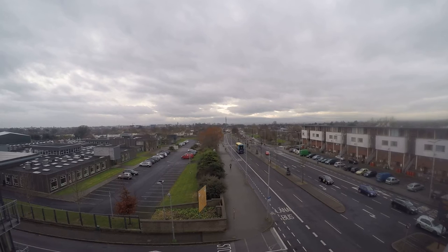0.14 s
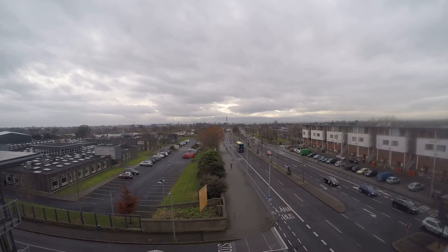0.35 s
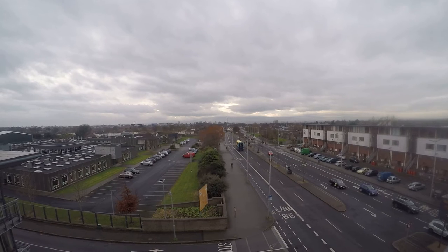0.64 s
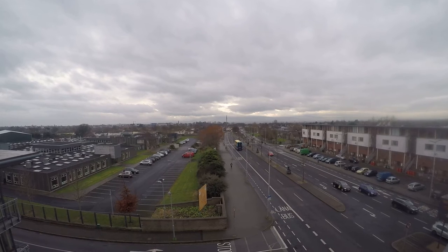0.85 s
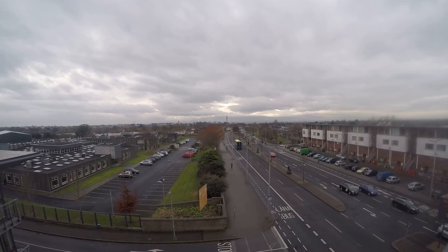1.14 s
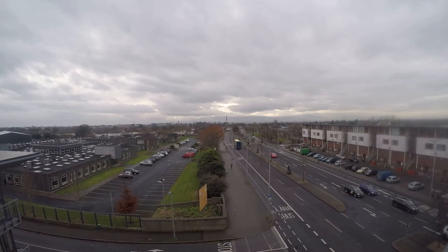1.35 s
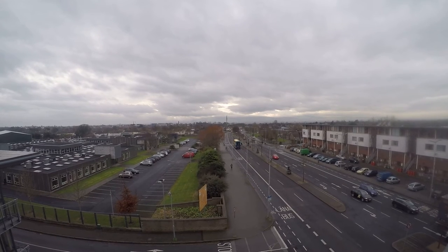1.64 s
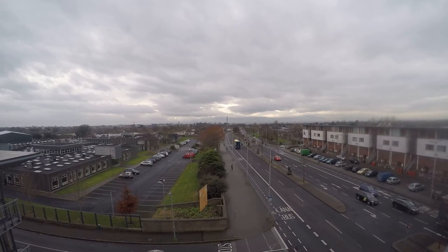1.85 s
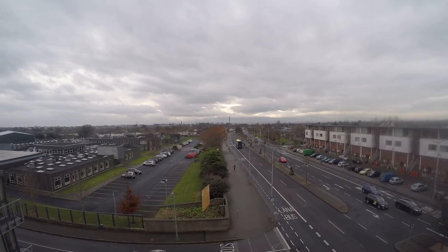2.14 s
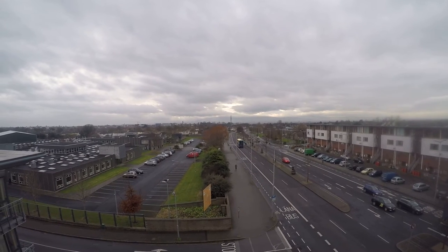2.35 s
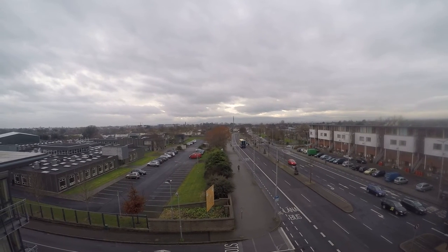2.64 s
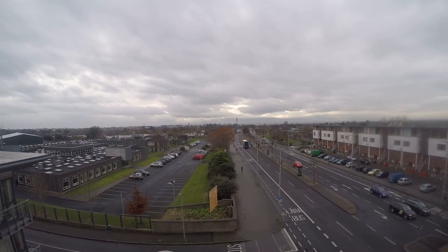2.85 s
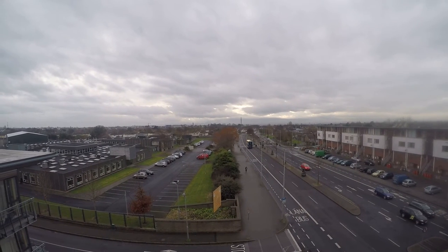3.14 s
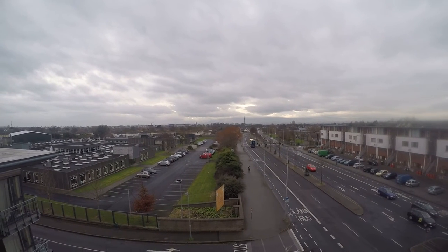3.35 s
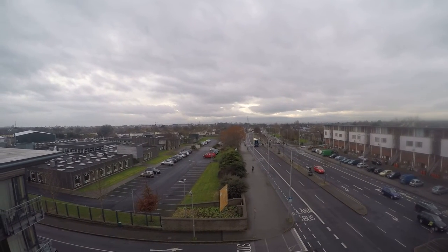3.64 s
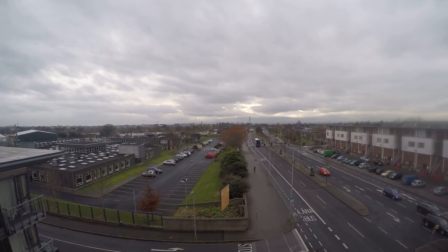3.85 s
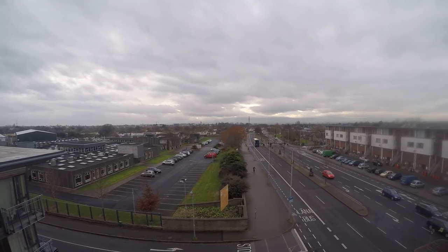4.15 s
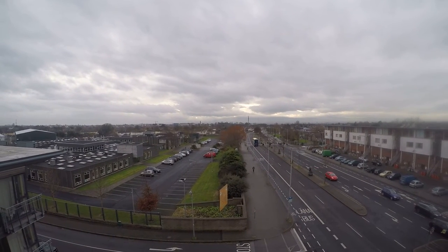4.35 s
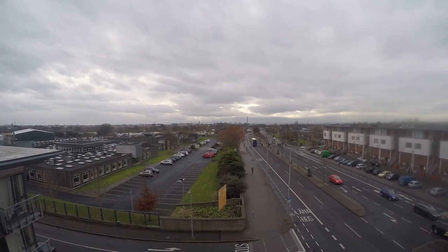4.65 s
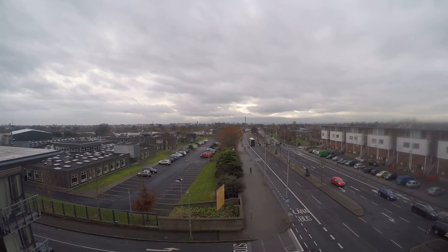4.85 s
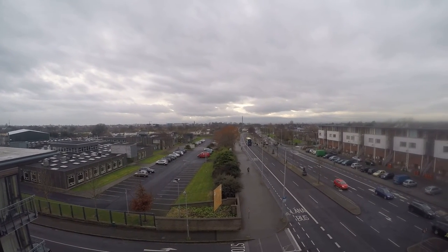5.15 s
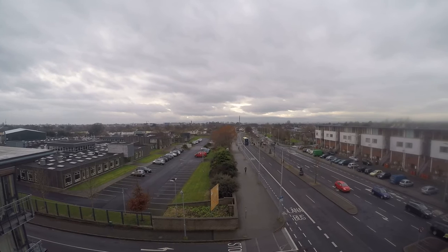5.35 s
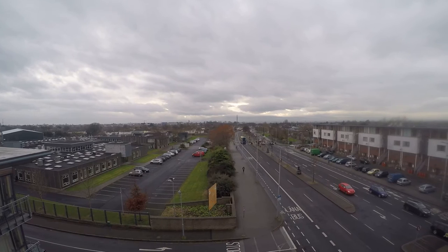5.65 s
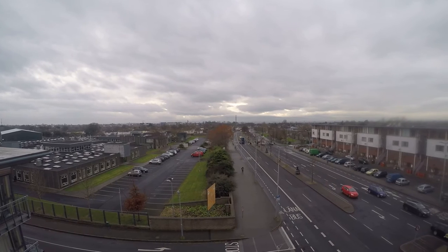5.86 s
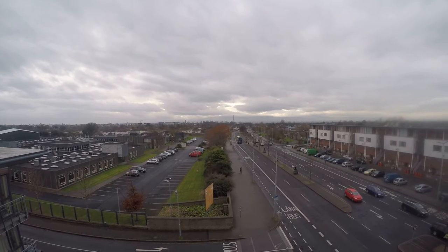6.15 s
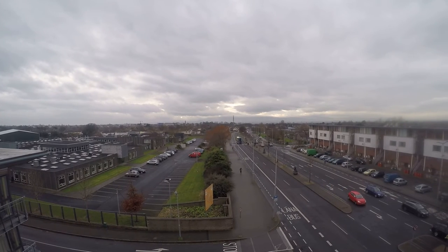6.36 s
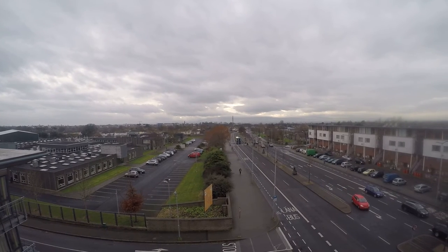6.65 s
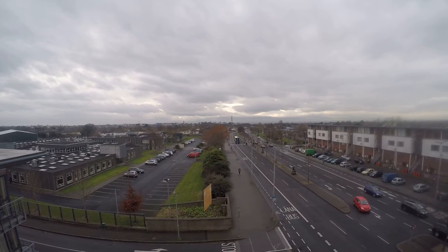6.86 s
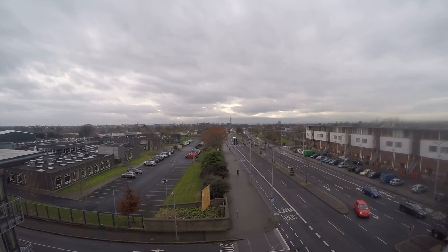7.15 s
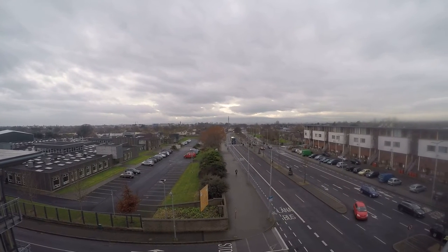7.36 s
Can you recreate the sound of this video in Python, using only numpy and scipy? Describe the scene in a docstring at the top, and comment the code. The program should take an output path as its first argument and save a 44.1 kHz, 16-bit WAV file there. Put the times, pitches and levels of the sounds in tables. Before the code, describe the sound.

Distant traffic rolls along a wide road as gusts thump the microphone; air brakes hiss twice and a short scrape follows.

```python
"""Tyres roar on a busy multi-lane road, heard from a high perch through a small camera in a plastic housing.
Engines rumble far below as their firings ring the exhausts, and a few nearer cars roll by.
Gusts buffet the microphone, the electronics whine thinly, and something ticks faintly and high.
Air brakes let out two hissing jets, and a short dry scrape judders at the end."""
import sys
import numpy as np
from scipy import signal
from scipy.fft import rfft, irfft, next_fast_len
from scipy.io import wavfile
from scipy.ndimage import uniform_filter1d, map_coordinates

SR = 44100
rng = np.random.default_rng(int(sys.argv[2]) if len(sys.argv) > 2 else 0)


def store_wav(level_fs):
    """Save 16-bit WAV to argv[1]."""
    pcm = np.round(np.clip(np.atleast_2d(level_fs), -1, 1) * 32767)
    wavfile.write(sys.argv[1], SR, pcm.T.astype(np.int16))


N = 331191
T = np.arange(N) / SR


def undb(db):
    """Decibels to gain."""
    return np.exp(np.maximum(db, -300) * (np.log(10) / 20))


def unit(x):
    """Scale to rms 1."""
    return x / np.sqrt(np.mean(x ** 2))


def curve(rows, column=1):
    """Automation lane: one column of a table, joined by straight lines in time."""
    rows = np.array(rows)
    return np.interp(T, rows[:, 0], rows[:, column])


def equalise(x, response):
    """Filter by a function that gives dB for each frequency."""
    size = next_fast_len(N + 4096)
    hz = np.maximum(np.fft.rfftfreq(size, 1 / SR), 1)
    return irfft(rfft(x, size) * undb(response(hz)), size)[:N]


def colour(x, points):
    """Shape x with an EQ curve of (frequency [Hz], gain [dB]) points, at rms 1."""
    hz, db = np.transpose(points)
    return unit(equalise(x, lambda f: np.interp(np.log(f), np.log(hz), db)))


def resonance(x, hz, width_hz):
    """Two-pole band-pass, at rms 1."""
    return unit(signal.lfilter(*signal.iirpeak(hz, hz / width_hz, fs=SR), x))


def noise():
    """White noise."""
    return rng.standard_normal(N)


def narrow(hz, width_hz):
    """Noise through the same resonance twice: steep skirts."""
    return resonance(resonance(noise(), hz, width_hz), hz, width_hz)


def walk(rate):
    """Random modulator that glides to about rate new values a second, at rms 1."""
    size = int(SR / rate)
    steps = rng.standard_normal(2048)[np.arange(N) // size]
    return unit(uniform_filter1d(steps, size))


def swell(s, half_width):
    """A bell-shaped envelope around time s."""
    return np.exp(-np.minimum(((T - s) / half_width) ** 2, 80) / 2)


def burst(s, attack, hold, release_db_per_s):
    """Envelope that rises from time s, holds and dies away."""
    age = T - s
    return np.clip(age / attack, 0, 1) * undb(-release_db_per_s * np.maximum(age - attack - hold, 0))


def even(x, seconds):
    """Leveller: divide out the signal's own slow swells."""
    return x / np.sqrt(uniform_filter1d(x ** 2, int(seconds * SR)) + 1e-9)


def tyres(db=-38.0, flicker_db=0.61):
    """Many tyres merge into one roar; each register flickers and the hiss drifts slowly."""
    # tyre roar of the whole road (frequency [Hz], gain [dB])
    roar_spectrum = [(60, 0.5), (140, 0), (250, 1), (400, -5.7), (560, -6.5), (1000, -10.5), (1500, -14.5),
                     (2200, -18.5), (2900, -22), (3300, -26), (4500, -29), (6500, -38), (9000, -45),
                     (15000, -51.5)]
    # drift of the hiss above 3.2 kHz (time [s], gain [dB])
    hiss_drift = [(0, 1.3), (1.1, 0.4), (2.5, .1), (3.6, 0), (4.2, -1), (4.85, 0.8), (5.45, -1.2),
                  (6.1, -0.5), (7.5, .3)]
    roar = colour(noise(), roar_spectrum)
    bands, below = 0, 0
    for edge_hz in (300, 700, 1500, 3200):
        upto = equalise(roar, lambda f: -10 * np.log10(1 + (f / edge_hz) ** 8))
        bands += (upto - below) * undb(flicker_db * walk(14))
        below = upto
    hiss = (roar - below) * undb(curve(hiss_drift) + flicker_db * walk(14) / 2)
    return (bands + hiss) * undb(db)


def engine(hz, uneven=0.0254, rough_db=1.0, pipe_hz=65, pipe_width_hz=50):
    """Uneven firings ring an exhaust; only the boom carries this far."""
    cycles = np.cumsum(hz * (1 + uneven * walk(9))) / SR
    firings = np.diff(np.floor(cycles), prepend=0) * undb(rough_db * walk(30))
    return unit(resonance(resonance(firings, pipe_hz, pipe_width_hz), pipe_hz, pipe_width_hz))


def engines(octave_db=-20, pitch_waver=0.0085, waver_db=2):
    """Cruising engines swell and fade; one clean hum sinks as its driver lifts off."""
    # engines in the stream (firing rate [Hz], level [dB])
    stream = [(46, -43.5), (59, -45), (71, -48)]
    # the engine that eases off (time [s], firing rate [Hz], level [dB])
    easing = [(4.6, 88, -51), (4.83, 86, -35), (4.98, 82, -33.5), (5.2, 73, -36), (5.32, 60.4, -38),
              (5.42, 53.3, -37), (5.7, 50.5, -45)]
    cruising = sum(engine(hz * (1 + .03 * walk(0.99))) * undb(db + 1.2 * walk(1.92))
                   for hz, db in stream)
    phase = 2 * np.pi * np.cumsum(curve(easing) * (1 + pitch_waver * walk(9.8))) / SR
    hum = unit(np.sin(phase) + undb(octave_db) * np.sin(2 * phase))
    return cruising + hum * undb(curve(easing, column=2) + waver_db * walk(23))


def wind_strength(breeze_db=-30, flutter_db=1.27, flutters_per_s=14):
    """Gusts build and die over the breeze, adding in power; the whole flow flutters."""
    # brief lulls in the breeze (time [s], half-width [s], depth [dB])
    lulls = [(.28, 0.025, -8), (.85, 0.09, -3), (2.862, 0.042, -11), (3.313, 0.11, -5.5), (5.1, 0.22, -3.5),
             (5.49, 0.086, -7.5), (5.78, 0.022, -6), (6.58, .03, -7)]
    # gusts on top of it (peak time [s], build-up [s], dying away [s], level [dB])
    gusts = [(.42, 0.06, 0.1, -23), (.64, 0.068, 0.045, -20.5), (1.65, 0.17, 0.17, -31),
             (2.32, 0.3, 0.087, -27.5), (4.3, 0.16, .12, -23.5), (4.57, 0.085, 0.07, -17),
             (4.71, .03, 0.04, -22.5), (5.677, 0.02, 0.022, -22), (5.94, .015, .03, -24.5),
             (6.165, 0.031, 0.043, -15.5), (6.35, .1, 0.05, -26), (6.67, .02, .025, -23.5),
             (6.8, 0.03, 0.06, -23.5), (7.03, 0.03, 0.052, -23), (7.3, 0.07, 0.21, -25)]
    breeze = undb(breeze_db + sum(depth_db * swell(s, span) for s, span, depth_db in lulls))
    gust_power = sum((undb(db) * swell(s, np.where(T < s, build, fall))) ** 2
                     for s, build, fall, db in gusts)
    return np.sqrt(breeze ** 2 + gust_power) * undb(flutter_db * walk(flutters_per_s))


def wind():
    """Slow eddies follow the gusts; the hardest ones slap the housing and reach higher."""
    # rumble of the eddies (frequency [Hz], gain [dB])
    eddies = [(8, -10.5), (20, 1), (30, 3.5), (50, 1), (68, -5), (90, -10.5), (140, -24.5), (300, -37),
              (1000, -93)]
    # slaps on the housing (time [s], half-width [s], level [dB], centre [Hz], bandwidth [Hz])
    buffets = [(0.526, 0.07, -29, 90, 70), (0.639, 0.019, -25.5, 75.6, 100), (2.14, 0.022, -39, 191, 35),
               (2.296, 0.08, -31, 48, 18), (4.46, 0.022, -31.5, 135, 80), (4.555, 0.034, -24, 80, 110),
               (4.55, .03, -39, 320, 220), (4.692, 0.035, -28, 100, 70), (5.683, 0.015, -25, 122, 35),
               (5.845, 0.017, -27, 112, 60), (5.91, .025, -31, 100, 40), (6.163, 0.017, -19.5, 70, 65),
               (6.167, 0.017, -36, 250, 150), (7.377, 0.11, -26, 47.7, 28)]
    out = even(colour(noise(), eddies), 0.0995) * wind_strength()
    for s, span, db, hz, width_hz in buffets:
        out += even(narrow(hz, width_hz), 0.0348) * swell(s, span) * undb(db)
    return out


def whine(hz=10275, width_hz=30, db=-86):
    """The thin whine of the camera's electronics."""
    return resonance(noise(), hz, width_hz) * undb(db)


def ticks(rise_s=0.012, fall_s=0.013, gap_s=.135, jitter_s=0.019, faint_db=-70.5, sizzle_db=-71.5):
    """High ticks smeared by distance: clear ones over a faint, loose pulse and a soft early sizzle."""
    # what the ticks ring with, lowest first (centre [Hz], bandwidth [Hz], relative level [dB])
    modes = [(5760, 520, 0), (6800, 750, -4), (7400, 2400, -2.5), (7850, 1000, -4.5)]
    # the clearer ticks (time [s], level [dB], stress on the lowest ring [dB])
    clear = [(.08, -60, 0), (.19, -62, 1), (.34, -65, -3), (.453, -61, -2), (.595, -59.5, -1),
             (.71, -63, 2), (.86, -66.5, 0), (.965, -63, 0), (.995, -62, 6), (1.05, -60, 9),
             (1.102, -55.3, 2), (1.208, -56.5, -1), (1.34, -60.5, -3), (1.587, -60, 3), (1.69, -61, 0),
             (1.825, -64, 1), (2.075, -64.5, -2), (2.19, -65, -2), (2.575, -61, -1), (2.68, -65, 0),
             (4.46, -66, 0), (4.75, -68, -2), (4.885, -67, -4), (5.04, -67.5, -3), (5.188, -68, -3),
             (5.36, -72, -2), (5.805, -67, 1)]
    faint = [(k * gap_s + jitter_s * late, faint_db + 1.5 * loud, 0)
             for k, (late, loud) in enumerate(rng.standard_normal((60, 2)))]
    low, *upper = (narrow(hz, width_hz) * undb(db + 1.3 * walk(9.8)) for hz, width_hz, db in modes)
    rings = np.array([low, sum(upper)])
    # one envelope for the lowest ring, one for the rest; the sizzle is their floor
    envelopes = np.tile(undb(sizzle_db) * swell(0.94, half_width=1), (2, 1))
    for s, db, stress_db in faint + clear:
        near = slice(*np.searchsorted(T, [s - .1, s + .1]))
        age = T[near] - s
        shape = undb(db) * np.exp(-(age / np.where(age < 0, rise_s, fall_s)) ** 2 / 2)
        balance = unit(undb(np.array([stress_db, 0])))
        envelopes[:, near] = np.maximum(envelopes[:, near], np.outer(balance, shape))
    return np.sum(rings * envelopes, axis=0) / np.std(rings.sum(axis=0))


def cars(drift=.03, drifts_per_s=2.5):
    """A few cars stand a little out of the stream; their resonances slide with speed and bearing."""
    # ring of body, tyre note and tread (centre [Hz], bandwidth [Hz], base level [dB])
    modes = [(441, 107, -48.5), (990, 240, -57), (2550, 360, -60)]
    # pass-bys (time [s], half-width [s], body and tread gain [dB], tyre note gain [dB])
    passes = [(.15, .22, -3, -5), (1.55, 0.27, -4, -2), (2.25, 0.42, 0, 0.5), (3.65, 0.35, -6.5, -3),
              (4.85, 0.23, -4, -4), (6, .4, -20, -3), (6.899, 0.23, -15, 2)]
    playhead = np.cumsum(1 + drift * walk(drifts_per_s))  # varispeed bends all three together
    rings = (even(narrow(hz, width_hz), .15) * undb(db) for hz, width_hz, db in modes)
    body, note, tread = (map_coordinates(ring, [playhead], mode="mirror") for ring in rings)
    return sum(((body + tread) * undb(body_db) + note * undb(note_db)) * swell(s, span)
               for s, span, body_db, note_db in passes)


def jet(envelope, spectrum, edge_hz, dulling=0.77):
    """Escaping air; as the pressure drops, the top of its hiss dies first."""
    air = colour(noise(), spectrum)
    body = equalise(air, lambda f: -10 * np.log10(1 + (f / edge_hz) ** 16))
    return (body + (air - body) * envelope ** dulling) * envelope


def air_brakes(waver_hz=95):
    """Two jets of air open fast and die away; the second whistles, sagging as the pressure drops."""
    # whistles of the opening valve (time [s], half-width [s], level [dB], pitch [Hz], sag [Hz/s])
    whistles = [(6.266, 0.012, -48, 2400, 3000), (6.25, .014, -53, 2870, 1),
                (6.315, 0.037, -57.5, 4130, 499), (6.28, 0.022, -61, 6100, 0)]
    # the two jets (start [s], attack [s], hold [s], release [dB/s], level [dB], dulls above [Hz])
    blasts = [(2.226, .007, .075, 40, -57.5, 12500), (6.222, 0.037, .008, 100, -47.5, 6400)]
    # the first, thin hiss (frequency [Hz], gain [dB])
    thin_jet = [(2500, -31), (5000, 0.5), (7500, -1.5), (11000, -2.5), (13500, -9), (15500, -9)]
    # the second, full hiss (frequency [Hz], gain [dB])
    full_jet = [(1500, -30), (2400, -4), (3400, -2.5), (4200, 1), (5000, -0.5), (6500, -11), (7700, -7.5),
                (8800, -20), (11000, -22), (14000, -35)]
    out = 0
    for s, span, db, hz, sag_hz_per_s in whistles:
        pitch = hz - sag_hz_per_s * np.clip(T - s, -.1, .1) + waver_hz * walk(200)
        out += unit(np.sin(2 * np.pi * np.cumsum(pitch) / SR)) * swell(s, span) * undb(db)
    for (s, attack, hold, release, db, edge_hz), spectrum in zip(blasts, (thin_jet, full_jet)):
        out += jet(burst(s, attack, hold, release), spectrum, edge_hz) * undb(db)
    return out


def scrape(slips_per_s=900, spread_db=1.0, judder_db=0.8, judders_per_s=130):
    """Three dry, juddering strokes: dense little slips and friction noise rattle several resonances."""
    # what the scrape keeps ringing (centre [Hz], bandwidth [Hz], relative level [dB])
    modes = [(1170, 260, -22), (1420, 200, -15), (1850, 400, -20), (2200, 250, -13.5), (2600, 380, -11.5),
             (3030, 250, -19), (3900, 200, -24.5), (4300, 250, -26)]
    # broad tone of the rubbing (frequency [Hz], gain [dB])
    rub_spectrum = [(200, 4), (500, 6.5), (1200, 0), (2200, 1.5), (2900, -2.5), (3400, -3), (4300, -11),
                    (5200, -11.5), (6500, -29), (10000, -50)]
    # the strokes (start [s], hold [s], level [dB])
    strokes = [(7.176, 0.08, -40), (7.294, 0.095, -38.5), (7.42, .08, -44)]
    slips = noise() * undb(spread_db * noise()) * (rng.random(N) < slips_per_s / SR)
    friction = unit(slips) + 1.5 * noise()
    rings = sum(undb(db) * resonance(resonance(friction, hz, width_hz), hz, 600)
                for hz, width_hz, db in modes)
    rub = even(colour(friction, rub_spectrum) + rings, 0.022)
    pressure = np.max([burst(s, attack=0.013, hold=hold, release_db_per_s=400) * undb(db)
                       for s, hold, db in strokes], axis=0)
    return rub * pressure * undb(judder_db * walk(judders_per_s))


def knock(start_s=7.19, attack_s=0.0066):
    """A soft knock starts the scrape: four modes ring briefly."""
    # the struck modes (frequency [Hz], level [dB], time to fall 60 dB [s])
    modes = [(300, -30, 0.11), (445, -27.5, 0.069), (613, -24, 0.07), (1130, -32.5, 0.14)]
    age = np.maximum(T - start_s, 0)
    ring = sum(undb(db - 60 * age / t60) * np.sin(2 * np.pi * hz * age) for hz, db, t60 in modes)
    return ring * (1 - np.exp(-age / attack_s))


def scene():
    """Road, wind and small events at one microphone."""
    bed = tyres() + engines() + wind() + whine()
    return (bed + ticks() + cars() + air_brakes() + scrape() + knock())[None]


def record(dry):
    """The plastic housing colours everything; the camera cuts the top above 15.2 kHz."""
    # resonances and notches of the housing (centre [Hz], half-width [Hz], gain [dB])
    housing = [(395.5, 33, 3), (458, 24, 4), (560, 55, -3), (630, 11, 1), (759, 57, -5), (862, 31, 3.5),
               (1065, 42, 3.2), (1384, 27, -0.5), (1476, 32, 2.5), (1620, 41, -0.5), (1930, 46, 2),
               (2626, 99, 3), (2910, 120, 3.5), (3250, 100, -2), (5460, 100, -0.5), (5760, 89, 1)]
    boxed = equalise(dry[0], lambda f: sum(db * np.exp(-((f - hz) / width) ** 2 / 2)
                                           for hz, width, db in housing))
    high_cut = signal.ellip(10, .1, 70, 15200, fs=SR, output="sos")
    return signal.sosfilt(high_cut, boxed)[None]


dry = scene()
out = record(dry)
store_wav(out)
```